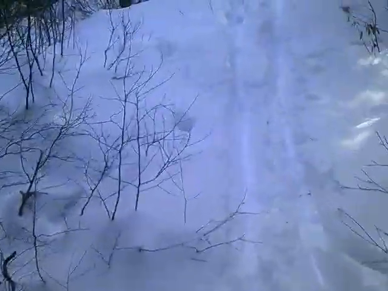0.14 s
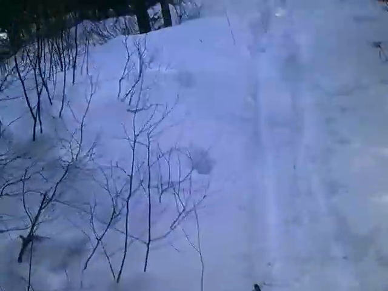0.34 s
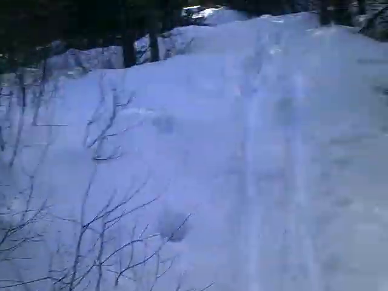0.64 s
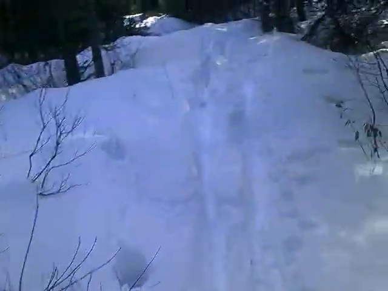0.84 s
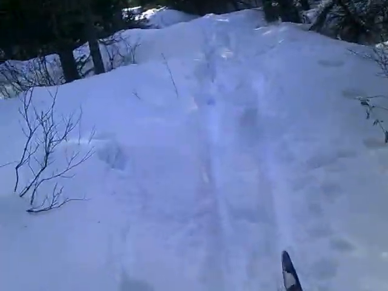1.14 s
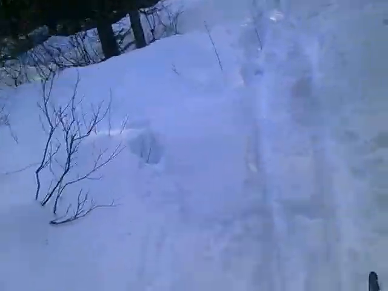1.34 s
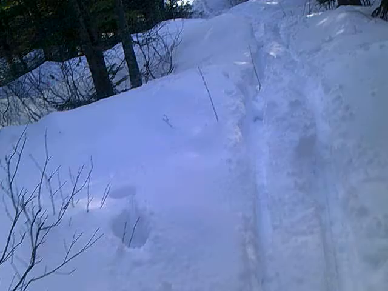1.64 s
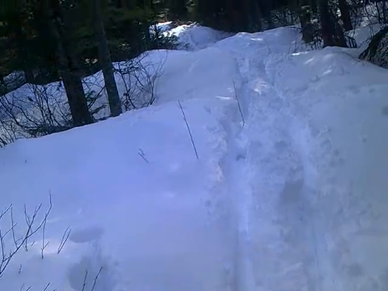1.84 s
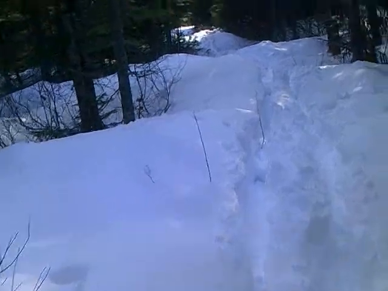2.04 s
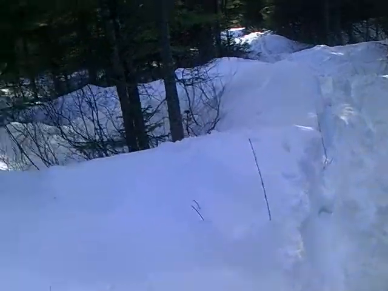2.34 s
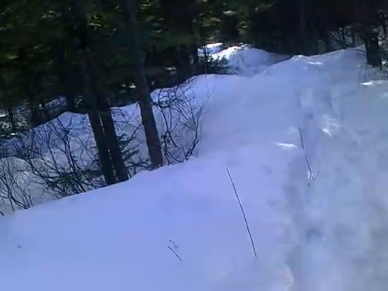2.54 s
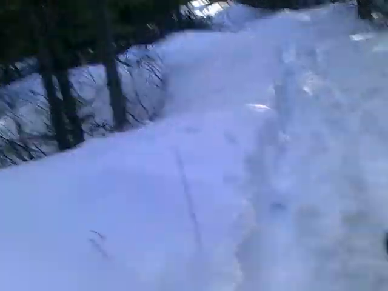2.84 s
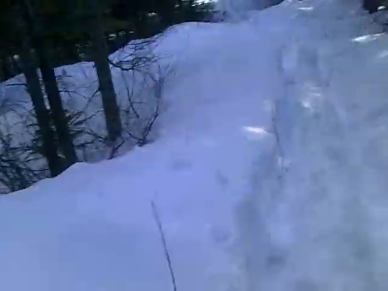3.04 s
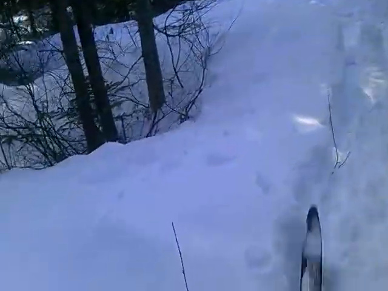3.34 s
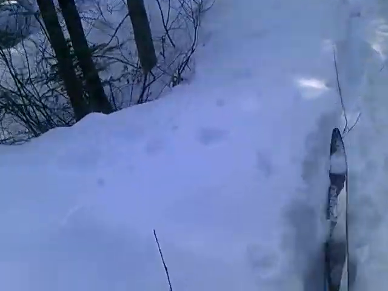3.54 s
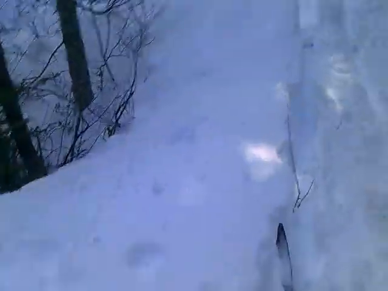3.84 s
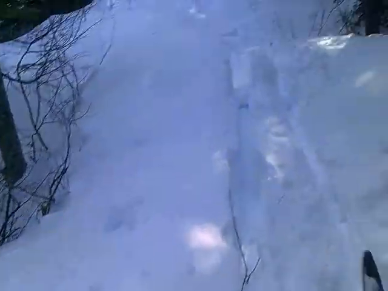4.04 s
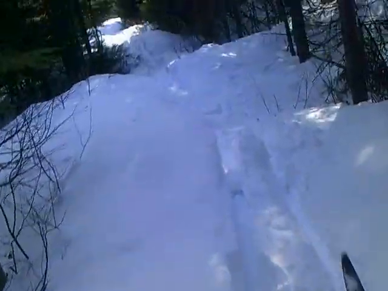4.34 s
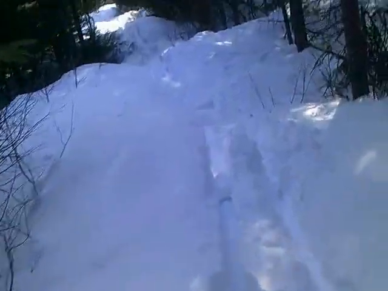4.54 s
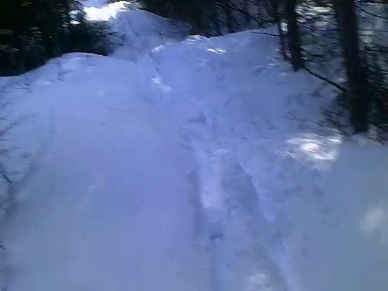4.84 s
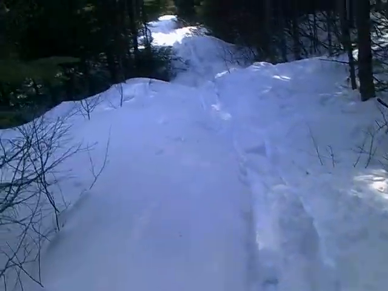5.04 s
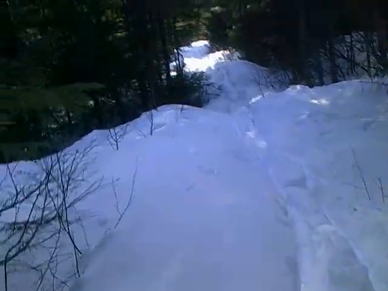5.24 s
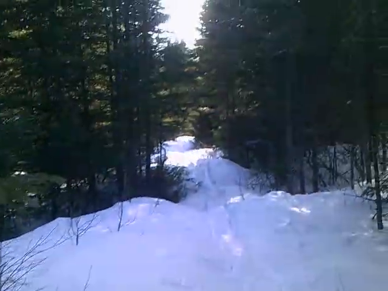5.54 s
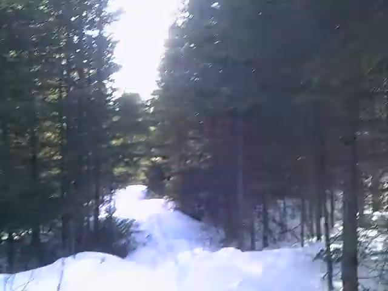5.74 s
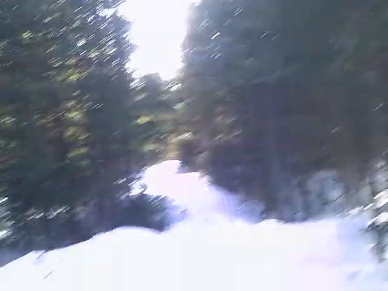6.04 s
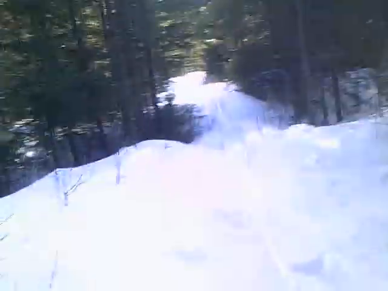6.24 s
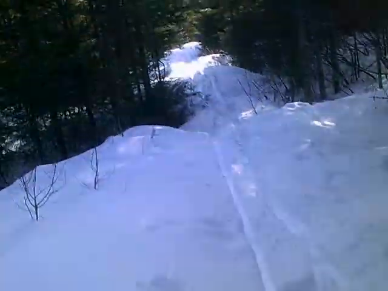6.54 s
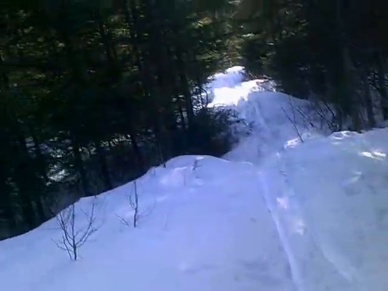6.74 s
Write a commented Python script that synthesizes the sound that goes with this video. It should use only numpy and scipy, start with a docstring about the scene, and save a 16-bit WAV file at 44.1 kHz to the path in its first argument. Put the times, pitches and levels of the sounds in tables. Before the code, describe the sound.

Cross-country skis hiss and crunch quietly in soft snow on a forest track throughout, with a stride roughly every 0.8 seconds, each bringing a swell of low air rumble and jacket rustle on the body-worn microphone. Ribbed jacket cloth zips briefly at 0.2 seconds, and more faintly near 1.7, 3.9 and 6.6. From 0.4 seconds, loose gear, probably a strap buckle, knocks on the camera case in short, hard, uneven clusters, much louder than the skis. Strong knocks land around 1.3, 2.0, 2.7 to 2.9 and 5.3 seconds. The camera also thuds softly against the jacket now and then. From 1.4 to about 5.6 seconds, cloth and strap scrape the case in quick rubs. The hardest knocks come between 6.0 and 6.4 seconds and overload the microphone, leaving only skis and rustle afterwards. The sound is mono, very close and narrow, with little treble.

```python
"""A snowy forest track, heard from one microphone in a small camera worn by a cross-country skier.
From the start, skis hiss and crunch in soft snow underfoot while air and clothing rumble on the microphone.
Jacket ribs zip briefly; then loose gear, probably a strap buckle, knocks on the case stride after stride.
The camera bumps softly on the jacket, and from about 1.4 s cloth and strap scrape over the case.
The hardest knocks come after 6 s; hard ones overload the narrow-band recorder."""
import sys
import numpy as np
from scipy import signal
from scipy.fft import rfft, irfft, next_fast_len
from scipy.io import wavfile

SR = 44100
rng = np.random.default_rng(int(sys.argv[2]) if len(sys.argv) > 2 else 0)


def transcribe(signal):
    """Save signal, clipped to [-1, 1], as a 16-bit WAV file at the path in sys.argv[1]."""
    frames = np.atleast_2d(signal).T
    limited = np.clip(frames, -1, 1)
    pcm = np.round(limited * 32767).astype(np.int16)
    wavfile.write(sys.argv[1], SR, pcm)


N = 303496
TIME = np.arange(N) / SR

# weight comes onto a ski: t/s, snow crunch/dB, snow hiss/dB, jacket rustle/dB, air buffet/dB
SKI_STRIDES = [(-.07, -38.5, -44, -34, -22.5), (0.53, -35.5, -48.5, -36, -25.5),
               (1.22, -34.5, -45.5, -40.5, -27.5), (2.088, -33.5, -50, -34, -25),
               (2.881, -30.5, -49.5, -41, -22.5), (3.659, -35, -51, -31, -23),
               (4.58, -38, -58, -36.5, -22.5), (5.258, -31.5, -41.5, -39, -27.5),
               (6.241, -46.5, -60, -40, -24)]
# a ski slides forward: start/s, length/s, level/dB, hiss/dB
SKI_SLIDES = [(0.04, 0.52, -41.5, -51), (0.626, 0.14, -40, -49.5), (0.972, 0.12, -44.5, -60),
              (1.574, 0.38, -42.5, -56), (2.15, 0.023, -34, -47), (2.402, .05, -40, -53),
              (2.684, 0.34, -37.5, -48), (3.134, 0.18, -39.5, -53), (3.349, 0.16, -40, -50),
              (3.846, .06, -35, -45.5), (3.936, 0.86, -44, -51.5), (4.705, 0.056, -48, -46),
              (4.802, 0.043, -35.5, -51), (4.866, .22, -32.5, -47.5), (5.337, .16, -35.5, -47),
              (5.576, 0.13, -33.5, -48), (5.846, 0.39, -43, -57), (6.114, 0.056, -46, -45),
              (6.511, 0.25, -45, -51), (6.852, .05, -37, -39.5)]
# spectra of snow underfoot, and of air and jacket right on the microphone: f/Hz, relative level/dB
SNOW_SPECTRUM = [(150, -16), (250, -5.5), (375, -5), (658, -4.5), (726, 3.5), (977, -1), (1070, 3),
                 (1230, 0.5), (1340, 0.5), (1440, -5), (1640, -10.5), (1790, -15), (1930, -19), (2570, -27),
                 (3460, -38.5), (4500, -52.5), (7610, -120)]
AIR_SPECTRUM = [(2, -15.5), (7, -0.5), (15, -16.5), (30, -19), (60, -28), (120, -51.5), (300, -67)]
RUSTLE_SPECTRUM = [(40, -2.5), (80, -2.5), (150, -6), (300, -15), (600, -13), (1500, -57.5)]
# ribbed cloth zips over itself: centre/s, half length/s, rib rate/Hz, level/dB, roughness 0-1
JACKET_ZIPS = [(0.235, 0.015, 274.4, -25.5, 1), (1.653, .022, 299.4, -34, 0.26),
               (3.888, .024, 285, -37, 0.87), (6.577, 0.036, 267.4, -36, 0.29)]
# spectrum of the ribbed cloth: f/Hz, relative level/dB
ZIP_SPECTRUM = [(400, -30), (800, 3), (1100, 3), (1350, 4), (1900, -2.5), (2400, -7.5), (3400, -10),
                (4200, -22)]
# modes of the case around the microphone: f/Hz, relative level/dB, t60/s
CASE_MODES = [(393, -43.5, 0.009), (520.6, -9, 0.04), (666.2, 3.5, 0.062), (836.6, 5, 0.042),
              (916.5, 11.5, 0.026), (1069, 3, 0.074), (1207, -4.5, 0.12), (1548, -10, 0.2),
              (1626, 4, 0.016), (1853, -2, 0.014), (2274, -4, 0.016), (2160, -17, 0.0065)]
# gear hits the case: t/s, level/dB, low-mode weight/dB, high-mode weight/dB
GEAR_KNOCKS = [(0.4237, -5, 24, -5), (0.5258, -5, 10, 13), (0.708, -18, -8, -28), (0.896, -25, 6, 0),
               (0.9089, -16.5, -5.5, -11), (1.0885, 1.5, -17, 3.5), (1.1618, -4, 5, 6.5),
               (1.2739, 6, -12, 15.5), (1.3582, -2.5, 10, -8), (1.408, -9.5, 14, -33), (1.8309, -20, 24, 0),
               (1.994, 8, -18, 14), (2.0025, -5.5, 4, -28), (2.044, -9.5, 9, -2), (2.0697, 1.5, 7, 10),
               (2.6815, -9.5, -1, -35), (2.738, 4.5, 7, 12), (2.8397, -5.5, 12, -13.5),
               (2.9053, 6.5, -14, 6.5), (2.924, 5, -8, -34.5), (2.957, -12, 8.5, -14),
               (3.2715, -16, 38, -1.5), (3.4093, -2, -30, 15), (3.6193, -15, 0, -35), (3.7065, -1, 8, -34),
               (4.1207, -20, -3, -32), (4.399, -9.5, 6, -15.5), (4.407, -4, -15, -12),
               (4.4218, -3.5, 30, -29), (4.629, -13, -20, -19), (4.6679, -4, 13.5, -26),
               (4.681, -10.5, -14, 1), (5.072, -5.5, -23, 1.5), (5.1459, -9.5, 21, -10),
               (5.2673, 9, -36, 14), (5.4562, -20, 34, -20), (5.619, -17, -3, 1), (5.6366, -13.5, 0, 0),
               (6.0135, 5.5, -0.5, 14), (6.04, -12, 8, 6), (6.2557, 10.5, -0.5, 10.5),
               (6.2628, -3, -8, -24), (6.293, -19, 9, -28), (6.322, -5.5, 18, -1), (6.3382, 10, -15, 10.5),
               (6.3487, 6.5, -12, 10.5)]
# the camera bumps on the jacket: t/s, f/Hz, level/dB
CAMERA_BUMPS = [(0.527, 87, -17.5), (0.539, 256, -23), (1.065, 125, -19.5), (1.841, 46, -21),
                (2.049, 141, -16), (2.093, 116.3, -12.5), (2.753, 126, -17), (2.77, 138, -12),
                (2.849, 99, -15.5), (3.619, 226, -14.5), (3.654, 74, -14), (3.709, 353, -10),
                (3.785, 109, -20), (5.27, 110, -16)]
# cloth and strap rub the case: centre/s, half length/s, level/dB, low-mode weight/dB, high-mode weight/dB
STRAP_SCRAPES = [(1.396, 0.015, -21.5, 3, -14.5), (2.327, .021, -34.5, -25, -3.5),
                 (2.464, 0.023, -25.5, 7, -15.5), (2.705, 0.0057, -32, 28, -31),
                 (2.806, 0.0093, -28, -8, -11), (2.826, .02, -21.5, 0, -38), (2.898, 0.01, -14, -10, -17),
                 (2.926, .025, -21.5, 23, -13), (3.253, .024, -36.5, 2, 10), (3.406, .018, -30, -3, -5),
                 (3.628, .031, -33.5, 12, -23), (4.316, .023, -27, 0, -29), (4.384, 0.0088, -25, 2, -13),
                 (4.4, .01, -20, -3, -2), (4.422, 0.01, -17, 32, -7), (4.67, 0.01, -32, -6, -5.5),
                 (4.913, .021, -32.5, 12, -22), (5.215, 0.0073, -31.5, -5, 15),
                 (5.624, 0.027, -36.5, 24, -39)]
# the recorder's smoothing filter: f/Hz, gain/dB
RECORDER_RESPONSE = [(20, 0.5), (3400, 1.5), (3800, -7), (4300, -11.5), (5000, -36), (5500, -70.5),
                     (6250, -36), (6900, -48), (7600, -37.5), (8100, -42), (9000, -86.5), (12000, -65.5)]


def amp(db):
    """Decibels to gain."""
    return 10 ** (np.asarray(db) / 20)


def unit(x):
    """Scale to rms 1."""
    return x / np.sqrt(np.mean(x ** 2) + 1e-18)


def colour(x, points):
    """Filter by a spectrum of points: f/Hz, level/dB."""
    hz, db = np.transpose(points)
    size = next_fast_len(len(x) + 2048)
    freqs = np.maximum(np.fft.rfftfreq(size, 1 / SR), 1)
    gain = amp(np.interp(np.log(freqs), np.log(hz), db))
    return irfft(rfft(x, size) * gain, size)[:len(x)]


def band(x, lo_hz, hi_hz):
    """The part of x between two frequencies."""
    return signal.sosfilt(signal.butter(4, [lo_hz, hi_hz], "band", fs=SR, output="sos"), x)


def add(out, start, sound):
    """Mix a sound in at a time in seconds."""
    i = max(int(start * SR), 0)
    out[i:i + len(sound)] += sound[:N - i]


def grains(size, rate_hz, spread_db):
    """Tiny slips and fractures at random moments, most weak and a few strong."""
    when, force, direction = rng.random((size, 3)).T
    strength = np.minimum(-np.log(1 - force), 3)
    return unit((when < rate_hz / SR) * np.sign(direction - .5) * amp(spread_db * strength))


def flutter(rate_hz):
    """A smooth random wobble with a spread near 1."""
    knots = rng.standard_normal(N // 100)
    return np.interp(TIME * rate_hz, np.arange(len(knots)), knots)


def swell(levels_db, floor_db, rise_s=0.074, fall_s=0.082):
    """Power that builds up to each stride and dies back to a steady floor."""
    power = np.full(N, amp(floor_db) ** 2)
    for (s, *_), db in zip(SKI_STRIDES, levels_db):
        width_s = np.where(TIME < s, rise_s, fall_s)
        power += amp(db) ** 2 * np.exp(-((TIME - s) / width_s) ** 2)
    return power


def sliding(levels_db, attack_s=0.013, release_s=0.043):
    """Power of the slides: the ski starts quickly, holds its speed and runs out."""
    power = np.zeros(N)
    for (s, length, *_), db in zip(SKI_SLIDES, levels_db):
        age = TIME - s
        moving = np.clip(age / attack_s, 0, 1) * np.clip(1 + (length - age) / release_s, 0, 1)
        power += (moving * amp(db)) ** 2
    return power


def skis(split_hz=1900, uneven_db=1.23):
    """Underfoot, snow crystals shear with each stride and slide; bits of crust give way in crunches."""
    _, _, slide_db, slide_hiss_db = np.transpose(SKI_SLIDES)
    _, press_db, press_hiss_db, _, _ = np.transpose(SKI_STRIDES)
    body_power = swell(press_db, floor_db=-48) + sliding(slide_db)
    hiss_power = swell(press_hiss_db, floor_db=-59.5) + sliding(slide_hiss_db)
    crystals = rng.standard_normal(N) + grains(N, rate_hz=1500, spread_db=3.5)
    breaks = np.abs(grains(N, rate_hz=55, spread_db=3))
    crunch = unit(signal.fftconvolve(breaks, np.exp(-TIME[:SR // 20] / .004))[:N])
    snow = colour(crystals * (1 + .55 * crunch), SNOW_SPECTRUM)
    body = signal.sosfiltfilt(signal.butter(4, split_hz, fs=SR, output="sos"), snow)
    hiss = snow - body
    both = unit(body) * np.sqrt(body_power) + unit(hiss) * np.sqrt(hiss_power)
    return both * amp(uneven_db * flutter(rate_hz=20))


def air_and_jacket(folds_db=5.5):
    """Each stride pushes air over the microphone and rubs the folds of the jacket right against it."""
    _, _, _, rustle_db, buffet_db = np.transpose(SKI_STRIDES)
    air_power = swell(buffet_db, floor_db=-34, rise_s=0.17, fall_s=0.18)
    cloth_power = swell(rustle_db, floor_db=-44, rise_s=0.11, fall_s=0.089)
    air = unit(colour(rng.standard_normal(N), AIR_SPECTRUM)) * np.sqrt(air_power)
    cloth = unit(colour(rng.standard_normal(N), RUSTLE_SPECTRUM)) * np.sqrt(cloth_power)
    return air + cloth * amp(folds_db * flutter(rate_hz=25))


def case_wall(x):
    """The case wall spreads a blow over a millisecond or two and passes little above its top mode."""
    for hz in (1100, 2000):
        x = x - 2 * signal.lfilter(*signal.iirpeak(hz, 1, fs=SR), x)  # all-pass
    return signal.sosfilt(signal.ellip(6, 1, 40, 2450, fs=SR, output="sos"), x)


def stroke(half_s, size):
    """Pressure of one rub: it builds, holds around 2 * half_s and lets go."""
    return np.exp(-np.abs(TIME[:size] / half_s - 2) ** 3)


def jacket_zips():
    """Close by, ribs of cloth catch in turn: a rough buzz, or a short squeak when they catch evenly."""
    out, size = np.zeros(N), SR // 4
    for s, half_s, hz, db, rough in JACKET_ZIPS:
        ribs_passed = np.cumsum(hz * (1 + .05 * rough * flutter(rate_hz=120)[:size])) / SR
        slips = unit(np.diff(np.floor(ribs_passed), prepend=0))
        # even slips come dulled through the case wall; rough ones snap and hiss as well
        snaps = slips + .8 * rng.standard_normal(size)
        catches = (1 - rough) * case_wall(slips) + rough * snaps
        add(out, s - 2 * half_s, amp(db) * stroke(half_s, size) * unit(colour(catches, ZIP_SPECTRUM)))
    return out


def case_ring(low_db, high_db):
    """The case's answer to one tap; place and hardness of the contact weight its modes."""
    hz, db, t60 = np.transpose(CASE_MODES)[:, :, None]
    t = TIME[:SR // 10]
    weight_db = np.interp(hz, [500, 850, 1150, 1900], [low_db, 0, 0, high_db])
    modes = amp(db + weight_db - 60 * t / t60) * np.cos(2 * np.pi * hz * t)
    ring = case_wall(modes.sum(axis=0))
    return ring / np.abs(ring).max()


def rebound(s, db, hard_db=6, low_db=3.5, high_db=-16.5):
    """A knock's duller second landing: later after a hard hit, fading out for soft ones."""
    flight_ms = 3.03 + 0.19 * (db - hard_db)
    loss_db = 3 + 0.95 * max(hard_db - db, 0)
    return s + flight_ms / 1000, db - loss_db, low_db, high_db


def gear_knocks(gain_db=-1, chatter_db=-27, chatter_s=0.013, crack_db=-28, crack_s=0.0029, damp_s=0.019):
    """Right at the microphone, hard gear taps the case, chatters for an instant and rebounds."""
    out, t = np.zeros(N), TIME[:SR // 10]
    rebounds = [rebound(s, db) for s, db, _, _ in GEAR_KNOCKS]
    for s, db, low_db, high_db in list(GEAR_KNOCKS) + rebounds:
        noise = rng.standard_normal((2, len(t)))
        chatter = amp(chatter_db) * case_wall(unit(band(noise[0], 630, 2400)) * np.exp(-t / chatter_s))
        crack = amp(crack_db + 0.17 * high_db) * unit(band(noise[1], 2500, 4210)) * np.exp(-t / crack_s)
        # gear that lands hard stays pressed on the case and damps it
        damping = np.exp(-amp(db) * (t / damp_s) ** 2)
        add(out, s, amp(db + gain_db) * damping * (case_ring(low_db, high_db) + chatter + crack))
    return out


def camera_bumps(rise_cycles=0.21):
    """The camera meets the jacket in padded thuds of about one cycle."""
    out, t = np.zeros(N), TIME[:SR // 10]
    for s, hz, db in CAMERA_BUMPS:
        age = hz * t / rise_cycles
        add(out, s, -amp(db) * age * np.exp(1 - age) * np.sin(2 * np.pi * hz * t))
    return out


def strap_scrapes(rasp_db=-19):
    """Cloth and strap stick and slip on the case, ringing it and rasping a little above its modes."""
    out, size = np.zeros(N), SR // 2
    for s, half_s, db, low_db, high_db in STRAP_SCRAPES:
        slips = grains(size, rate_hz=2500, spread_db=3)
        ring = unit(signal.fftconvolve(slips, case_ring(low_db, high_db))[:size])
        rasp = amp(rasp_db + .5 * high_db) * unit(band(slips, 1800, 3700))
        add(out, s - 2 * half_s, amp(db) * stroke(half_s, size) * (ring + rasp))
    return out


def scene():
    """Everything as it reaches the single body-worn microphone."""
    close_contacts = gear_knocks() + strap_scrapes() + jacket_zips()
    return (close_contacts + skis() + air_and_jacket() + camera_bumps())[None]


def record(dry, overload=0.865, sampling_hz=8000, ceiling=1.001):
    """Hard knocks overload the input; slow sampling leaves a faint treble image; overshoots clip again."""
    clipped = np.clip(dry[0], -overload, overload)
    narrow = signal.sosfilt(signal.butter(10, 3900, fs=SR, output="sos"), clipped)
    mirror = 2 * np.cos(2 * np.pi * sampling_hz * TIME) * band(narrow, 400, 3900)
    smoothed = np.clip(.89 * colour(narrow + mirror, RECORDER_RESPONSE), -ceiling, ceiling)
    rounded = signal.sosfiltfilt(signal.butter(12, 8300, fs=SR, output="sos"), smoothed)
    top_cut = signal.ellip(8, .2, 70, 17600, fs=SR, output="sos")
    return signal.sosfilt(top_cut, np.clip(rounded, -1, 1))[None]


dry = scene()
out = record(dry)
transcribe(out)
```